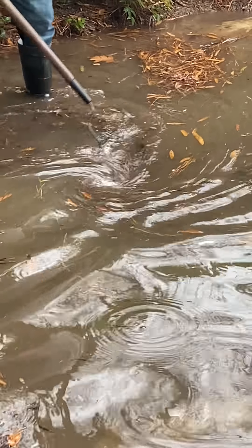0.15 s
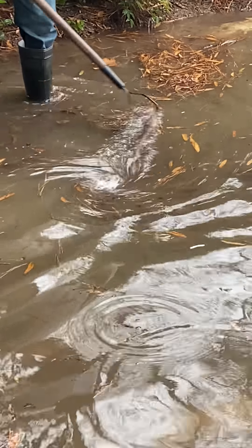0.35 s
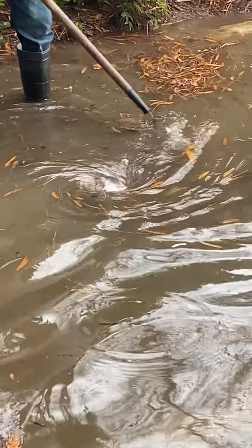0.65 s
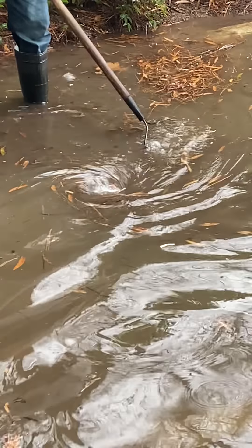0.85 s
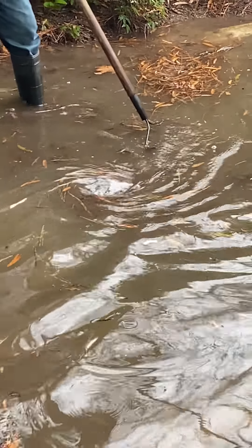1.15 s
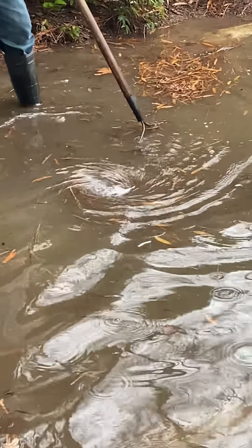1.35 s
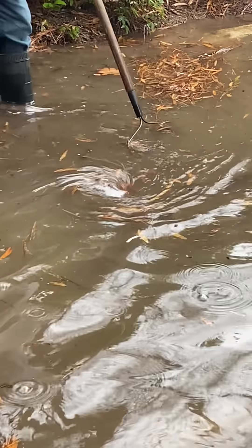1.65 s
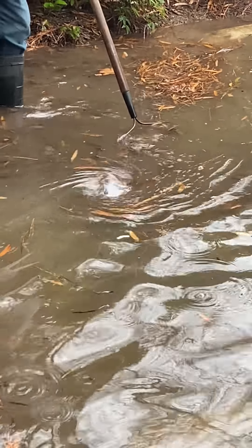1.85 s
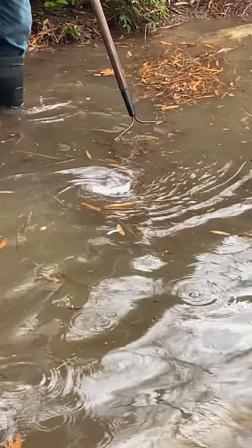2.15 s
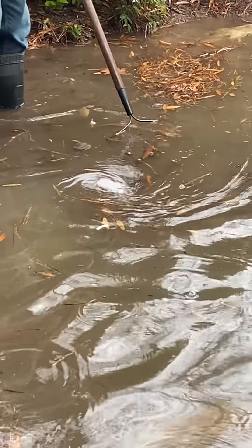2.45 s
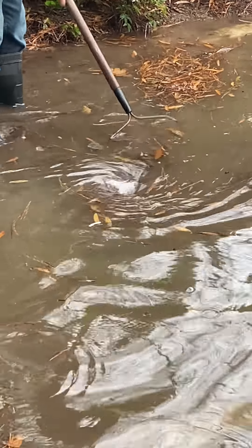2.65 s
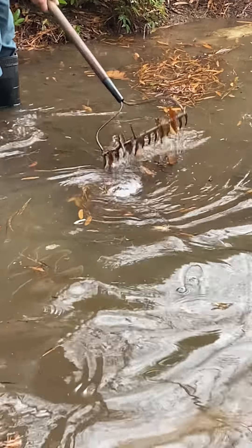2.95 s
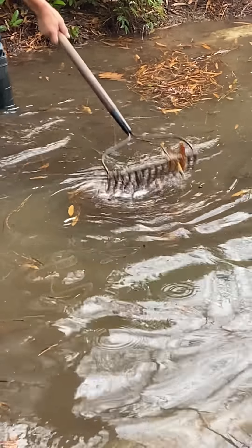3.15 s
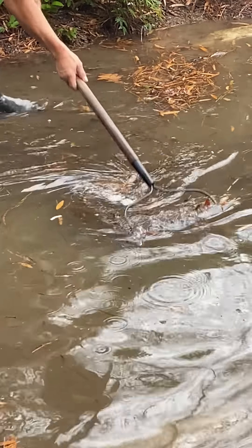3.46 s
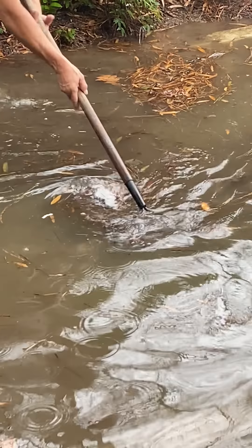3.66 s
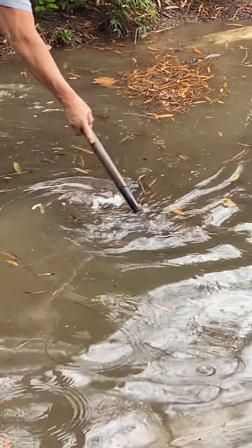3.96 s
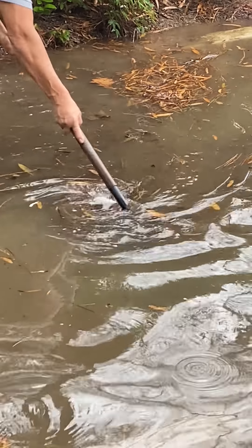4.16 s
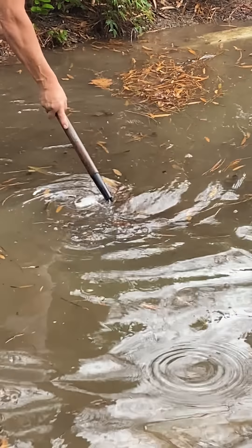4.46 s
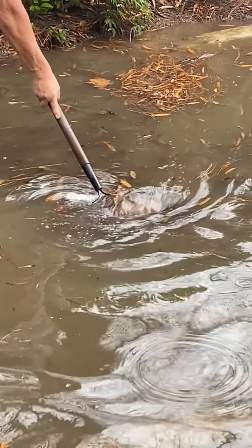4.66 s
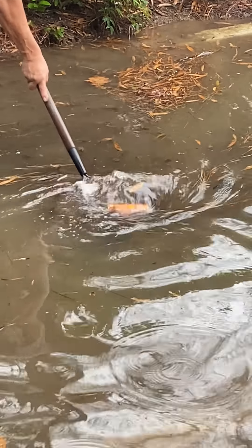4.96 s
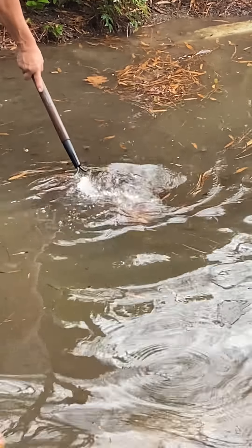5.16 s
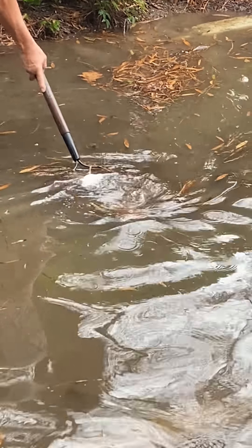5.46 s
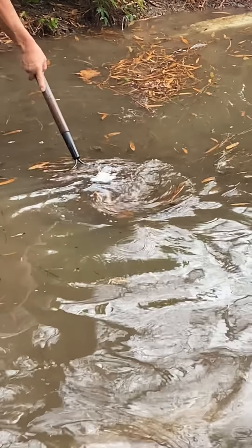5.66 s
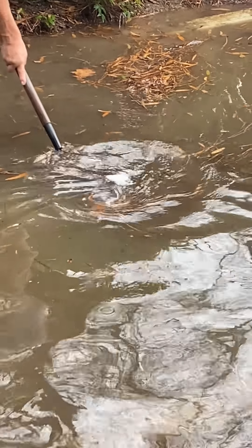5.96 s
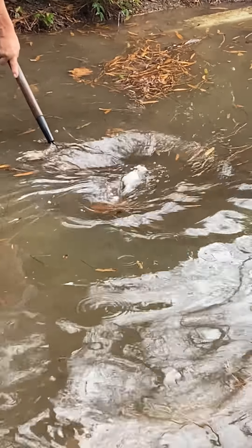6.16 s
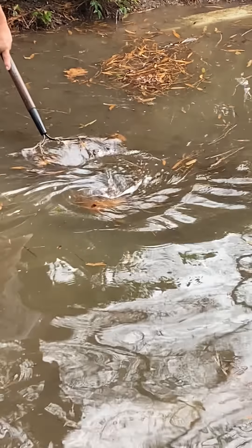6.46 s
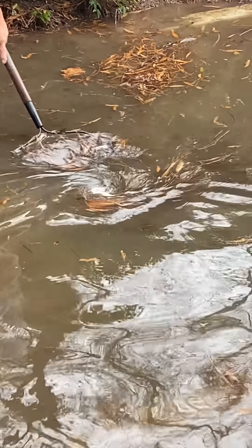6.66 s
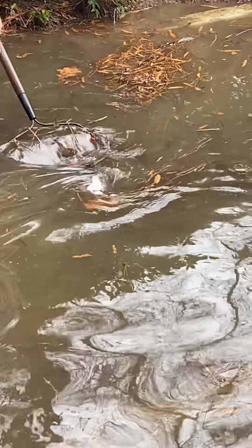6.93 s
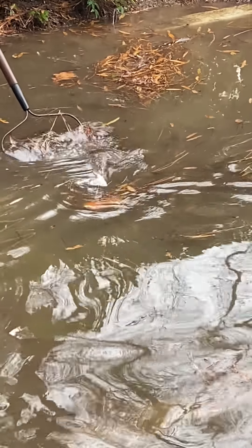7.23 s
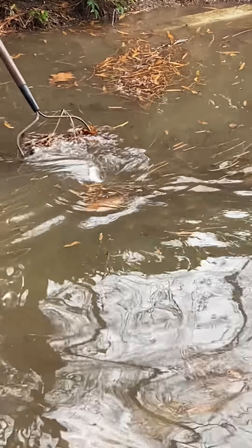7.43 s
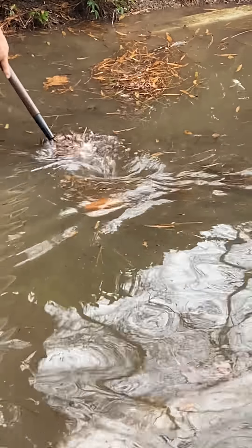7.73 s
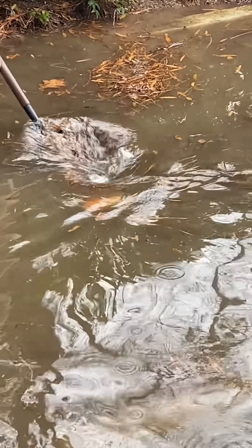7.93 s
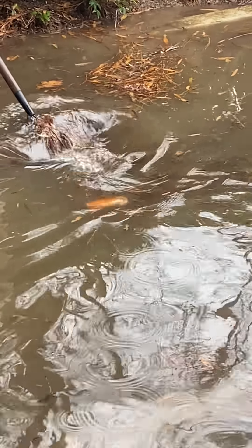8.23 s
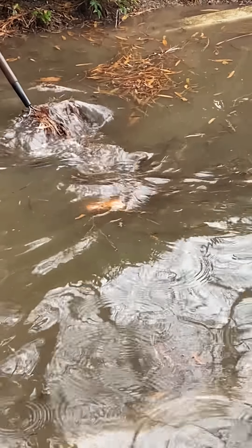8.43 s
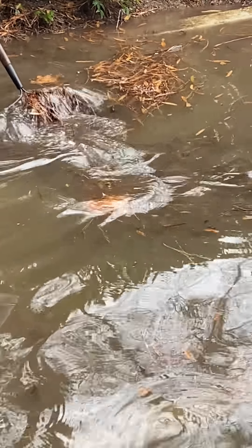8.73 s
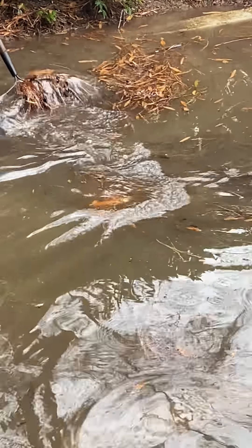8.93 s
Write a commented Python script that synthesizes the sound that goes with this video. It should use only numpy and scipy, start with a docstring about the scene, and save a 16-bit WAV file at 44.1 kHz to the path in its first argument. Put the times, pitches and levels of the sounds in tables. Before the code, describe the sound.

Deep steady rush of floodwater falling into a street drain, with fizzing stirred water, bubbles and drips, faint bird chips, and short steel rake scrapes.

```python
"""Floodwater pours through a street drain: a deep, steady rush of shaped noise from first to last.
From the start stirred water fizzes (noise and bubble crowds), drops crack and bubbles ring; from 0.3 s
birds chip in the trees as quick upward sweeps. A steel rake scrapes the grate near 0.5 s, then at
4.2-5.4 s and 7.7-9.1 s: stick-slip noise rings its modes. Two microphone ports hear it all."""
import sys
import numpy as np
from scipy import signal
from scipy.fft import rfft, irfft
from scipy.io import wavfile
from scipy.ndimage import uniform_filter1d

SR = 44100
rng = np.random.default_rng(int(sys.argv[2]) if len(sys.argv) > 2 else 0)


def to_wav(s):
    """Save 16-bit WAV."""
    ch = np.atleast_2d(s).T  # columns
    pcm = np.round(np.clip(ch, -1, 1) * 32767)  # PCM
    wavfile.write(sys.argv[1], SR, pcm.astype(np.int16))


N = 400869
T = np.arange(N) / SR
HZ = np.maximum(np.fft.rfftfreq(N, 1 / SR), 1)
MID_SIDE = np.array([[1], [-1]])  # sign of the side signal at the left and right port


def undb(db):
    """Decibels to amplitude ratio."""
    return 10 ** (np.asarray(db) / 20)


def over_hz(table, column=1):
    """Spread a table column over all frequencies, straight on a log axis."""
    rows = np.array(table, float)
    log_hz = np.log(np.maximum(rows[:, 0], 1))
    return np.interp(np.log(HZ), log_hz, rows[:, column])


def shape(x, gain):
    """Filter by a gain per frequency."""
    return irfft(rfft(x) * gain, N)


def unit(x):
    """Scale to an RMS of 1."""
    return x / np.sqrt(np.mean(x ** 2))


def walk(rate_hz):
    """Random levels, held 1 / rate_hz and smoothed twice; standard deviation 1."""
    hold = int(SR / rate_hz)
    steps = np.repeat(rng.standard_normal(N // hold + 1), hold)
    smooth = uniform_filter1d(uniform_filter1d(steps, hold), hold)[:N]
    return smooth / smooth.std()


def add(track, start_s, sound):
    """Mix a sound into a track at its start time."""
    i = int(start_s * SR)
    track[i:i + len(sound)] += sound[:N - i]


def bubble(hz, rise, length_s, swell=0.049, fade_db=60):
    """A pocket of air rings, fades and climbs in pitch as it nears the surface."""
    u = np.arange(int(length_s * SR)) / (length_s * SR)
    edges = np.minimum(u / swell, 1) * np.minimum((1 - u) / swell, 1)
    cycles = hz * length_s * (u + rise * u ** 2 / 2)
    return np.sin(2 * np.pi * cycles) * undb(-fade_db * u) * edges


def crowd(low_hz, high_hz, cycles, spread_db, count):
    """Many bubbles at random moments, of random size, ring, rise and strength."""
    out = np.zeros(N)
    for when, size, ring, rise, loud in rng.random((count, 5)):
        hz = low_hz * (high_hz / low_hz) ** size
        length_s = cycles * (0.75 + ring) / hz
        level_db = -spread_db * np.log(1.02 - loud)
        add(out, when * N / SR, bubble(hz, 0.91 * rise, length_s) * undb(level_db))
    return out


def echo(x, t60_s, db, build_s, apart):
    """Scattered reflections build up and die away, partly unlike at the two ports."""
    t = np.arange(SR) / SR
    envelope = undb(-60 * t / t60_s) * np.minimum(t / build_s, 1)
    same, unlike = rng.standard_normal((2, SR)) * envelope
    tails = (same + apart * unlike * MID_SIDE) / np.linalg.norm(same)
    return x + undb(db) * signal.fftconvolve(x[None], tails, axes=1)[:, :N]


CHIP_SWEEP_HZ = 1320
# bird chips: (time [s], level [dB], top pitch [Hz], length [s], husk: pitch noise before smoothing [Hz])
CHIPS = [(.3, -54, 7800, .021, 1200), (1.294, -59, 8000, .012, 1500), (2.108, -51, 7870, .019, 150),
         (2.476, -58, 8050, .012, 1200), (2.57, -49, 7800, 0.014, 1200), (4.407, -56, 8100, .01, 600),
         (4.52, -58, 7700, .02, 300), (5.768, -54, 7560, .013, 1200), (6.202, -61, 7340, .02, 600),
         (6.703, -52, 8000, 0.015, 1200), (8.186, -42, 7300, 0.027, 600)]


def birds():
    """Chips shoot up in pitch and level off; random pitch flutter makes some husky."""
    out = np.zeros(N)
    for start_s, db, top_hz, length_s, husk_hz in CHIPS:
        u = np.arange(int(length_s * SR)) / (length_s * SR)
        husk = uniform_filter1d(rng.standard_normal(len(u)), size=40)
        hz = top_hz - CHIP_SWEEP_HZ * np.exp(-u / 0.24) + husk_hz * husk
        envelope = np.sin(np.pi * u ** 0.82) ** 0.23
        add(out, start_s, undb(db) * envelope * np.sin(2 * np.pi * np.cumsum(hz) / SR))
    return out


FLOW_DB, FLOW_WANDER_DB = -2.5, .4  # level of the rush above its spectrum, slow drift
# spectrum of the rush: (frequency [Hz], density before FLOW_DB [dB per Hz])
RUSH = [(25.3, -76), (40.5, -62), (58.8, -50.5), (108, -55), (166, -62), (324, -71), (558, -75), (874, -78),
        (1590, -90), (2680, -99), (3700, -106), (6760, -110), (8330, -113), (11600, -128)]
# likeness of the rush at the two ports: (frequency [Hz], correlation [0-1])
LIKENESS = [(130, 1), (200, .995), (324, .985), (558, .88), (874, .44), (1590, .5), (2680, 1), (3700, .88),
            (6760, .9), (11600, .5)]


def drain():
    """Falling water booms in the shaft; the middle range reaches the ports from many sides."""
    like = np.clip(over_hz(LIKENESS), 0, 1)
    gain = undb(over_hz(RUSH)) * np.sqrt(SR / 2)
    mid = shape(rng.standard_normal(N), gain * np.sqrt((1 + like) / 2))
    side = shape(rng.standard_normal(N), gain * np.sqrt((1 - like) / 2))
    return (mid + side * MID_SIDE) * undb(FLOW_DB + FLOW_WANDER_DB * walk(6))


SPRAY_DB, SPRAY_WANDER_DB = -3.7, 3.5  # finest droplets relative to the fizz, their drift
# stirring of the water: (time [s], fizz level [dB], gurgle above the fizz [dB])
STIR = [(0, -61, 9), (.45, -72, -20), (.55, -60, 5), (.585, -48, -6), (.62, -58.5, 4), (.67, -56.5, -1),
        (.8, -68, 5), (1.1, -70.5, 0), (2.33, -80, 13.5), (2.45, -66.5, 4), (2.85, -64, 0),
        (2.98, -58.5, -10), (3.24, -65.5, -17), (3.45, -61, -6), (3.9, -71, 4), (4.65, -62.5, 4.5),
        (4.8, -65, 4), (5.05, -59, 10.5), (5.5, -69, 4), (5.9, -68, 8), (6.4, -72, 10.5), (7.0, -67, 3),
        (7.4, -60.5, -1.5), (7.82, -57, -3.5), (8.33, -54, 3.5), (8.5, -55.5, 6.5), (8.63, -66, -3),
        (8.75, -57, -0.5), (9.09, -61, 3)]
# filter colouring the fizz: (frequency [Hz], relative gain [dB])
FIZZ = [(900, -27), (1600, -8), (2500, -7.5), (4000, -4), (5500, -5.5), (7300, -3), (9000, -3.5),
        (11000, -13.5), (12500, -25)]


def stirred_water():
    """Flickering hiss, spattering droplets and a churn of larger bubbles follow the stirring."""
    time_s, fizz_db, gurgle_db = np.transpose(STIR)
    hits = (rng.random(N) < 130 / SR) * undb(2.0 * np.minimum(rng.exponential(size=N), 3))
    patter = signal.lfilter([1], [1, -.985], hits)  # bursts of about 1.5 ms
    hiss = unit(rng.standard_normal(N) * undb(2.57 * walk(25)) * (1 + 1.74 * patter))
    spatter = unit(crowd(1490, 12000, 8.7, 4.2, count=4000))
    chirps = unit(crowd(1338, 5880, 39.5, 4.0, count=1600))
    mix = hiss + undb(-8.0) * spatter + undb(-4.5) * chirps
    fizz = unit(shape(mix, undb(over_hz(FIZZ)) * (HZ > 500)))

    spray = shape(fizz, 1 / (1 + (6500 / HZ) ** 8))  # finest droplets, drifting on their own
    spray_gain = undb(SPRAY_DB + SPRAY_WANDER_DB * walk(3.03))
    gurgle = unit(crowd(501.4, 2830, 20.0, 3.1, count=6000))
    plinks = unit(crowd(910, 4220, 24.0, 4.5, count=450))  # separate drips that stand out
    water = fizz + spray * (spray_gain - 1)
    water += plinks * undb(-7.5)
    water += gurgle * undb(np.interp(T, time_s, gurgle_db))
    return water * undb(np.interp(T, time_s, fizz_db))


FAINT_DROP_DB, FAINT_SPREAD_DB, FAINT_TREBLE_DB = -55, 8, -22  # lowest level, range, dullest treble
BUBBLE_MS_AT_1K, BUBBLE_LENGTH_POWER = 20, 0.89  # length without glide; higher bubbles ring shorter
GLIDE_STRETCH = .8  # far-gliding bubbles ring longer
BIRTH_DB = -12.5  # pinch-off snap relative to its bubble
# drops that snap on the surface: (time [s], level [dB], treble above that [dB])
DROPS = [(0.048, -40.5, -13), (0.0616, -42.5, 2), (0.3124, -43.5, -35), (0.489, -52, -24),
         (0.521, -41, -20), (0.549, -48, -30), (0.672, -44, -19), (0.9303, -54, -31), (0.9677, -50.5, -4),
         (1.6415, -48.5, -5), (1.796, -51, -20), (2.442, -52, -28), (2.5678, -47, -25), (2.6522, -39, -6),
         (2.908, -42.5, -23), (3.258, -51, 4), (3.346, -38.5, -4), (3.5064, -41, -25), (3.7544, -42, -10),
         (3.7864, -38.5, -19), (4.109, -50, -1), (4.7074, -49, 10), (4.8755, -34, -6), (5.2719, -43, 0),
         (5.662, -48.5, -20), (5.903, -46.5, -36), (6.173, -43.5, -25), (6.2473, -44, -29),
         (6.5694, -47, -2), (6.6653, -45, -35), (7.124, -49, 7), (7.337, -46.5, -29), (7.408, -47, 4),
         (7.458, -46.5, 4), (7.4869, -40.5, -9), (7.899, -41.5, -14)]
# single bubbles: (time [s], level before fading [dB], start pitch [Hz], pitch rise [share of start])
BUBBLES = [(0.216, -40.5, 3930, .15), (.501, -44.5, 2950, .05), (0.532, -40, 2940, .05),
           (0.566, -31.5, 624, .05), (0.669, -44, 3200, 0.046), (0.93, -38.5, 3240, .05),
           (2.892, -43.5, 2050, .42), (2.938, -44, 1640, .05), (3.049, -45, 1330, .14),
           (3.135, -45, 3280, .05), (3.376, -45, 2110, .05), (3.431, -41, 2880, .34),
           (3.461, -41, 3440, 0.093), (3.472, -40, 1360, 0.25), (3.523, -31, 2150, .05),
           (3.754, -36, 3600, .1), (4.133, -44, 3230, .04), (4.228, -28, 1084, 0.22),
           (4.239, -38.5, 1500, 0.64), (4.284, -34, 1185, 0.13), (4.503, -37, 960, 0.35),
           (4.955, -39, 826, .08), (5.047, -32.5, 1096, 0.26), (5.072, -36, 514, 0.86),
           (5.199, -35.5, 940, 0.14), (5.267, -39.5, 2130, .08), (6.665, -36.5, 3470, 0.09),
           (6.771, -45, 3200, 0.11), (7.26, -39.5, 2640, 0.21), (8.168, -34, 3570, .12),
           (8.196, -36, 2850, .55), (8.61, -35, 690, 0.057), (8.658, -35, 980, 0.05)]


def drips():
    """Drops crack as short noise bursts; bubbles snap as they pinch off, then ring."""
    out = np.zeros(N)
    t = np.arange(512) / SR
    low = signal.butter(2, [1800, 6600], "band", fs=SR, output="sos")
    high = signal.butter(2, [6000, 8700], "band", fs=SR, output="sos")
    faint = [(when * N / SR, FAINT_DROP_DB + FAINT_SPREAD_DB * loud, FAINT_TREBLE_DB * dullness)
             for when, loud, dullness in rng.random((24, 3))]
    for start_s, db, treble_db in DROPS + faint:
        crack = rng.standard_normal(len(t)) * np.minimum(t / 0.0013, 1) * np.exp(-t / 0.002)
        dull, sharp = signal.sosfilt(low, crack), signal.sosfilt(high, crack)
        drop = dull / np.abs(dull).max() + undb(treble_db) * sharp / np.abs(sharp).max()
        add(out, start_s, undb(db) * drop)
    for start_s, db, hz, rise in BUBBLES:
        length_s = BUBBLE_MS_AT_1K / 1e3 * (1e3 / hz) ** BUBBLE_LENGTH_POWER
        length_s *= 1 + GLIDE_STRETCH * rise
        snap = signal.sosfilt(low, rng.standard_normal(len(t)) * np.exp(-t / .0012))
        add(out, start_s, undb(db + BIRTH_DB) * snap / np.abs(snap).max())
        add(out, start_s, undb(db) * bubble(hz, rise, length_s, swell=0.19, fade_db=24.5))
    return out


CHATTER_GAP_S, CHATTER_SPREAD_DB, CHATTER_DETUNE = .02, 0.5, 0.018  # detune: share of the pitch
# light drags over the bars: (start [s], length [s], mean level [dB], mean tine pitch [Hz],
# treble above the level [dB])
DRAGS = [(4.215, .045, -38.5, 2100, -19), (4.437, .1, -42, 1950, -27), (4.882, .055, -42, 1940, -1),
         (5.006, .03, -37, 1400, -11), (8.726, .36, -44.5, 1520, 4.5)]


def chatter():
    """A tine hopping from bar to bar turns each light drag into a row of uneven small catches."""
    rows = []
    for start_s, length_s, db, touch_hz, treble_db in DRAGS:
        gap, loud, pitch = rng.standard_normal((24, 3)).T
        times_s = start_s + CHATTER_GAP_S * (np.arange(len(gap)) + .25 * gap)
        levels_db = db + CHATTER_SPREAD_DB * loud
        pitches_hz = touch_hz * (1 + CHATTER_DETUNE * pitch)
        rows += [(when, level, hz, treble_db)
                 for when, level, hz in zip(times_s, levels_db, pitches_hz)
                 if when < start_s + length_s]
    return rows


CATCH_S = 0.014  # decay time of the grip
# catches of a tine on the grate: (time [s], peak level [dB], pitch of the touching tine [Hz],
# treble above the level [dB])
SCRAPES = [(0.56, -27.5, 3500, -4), (0.5826, -28.5, 2000, -4), (0.593, -47, 1650, -12),
           (4.2054, -34, 1920, -32), (4.2289, -31, 2200, -29), (4.2818, -30, 1910, -28),
           (4.2958, -34.5, 1290, -28), (4.503, -36.5, 1970, -18), (4.559, -28, 1990, -11),
           (4.5675, -29.5, 2000, -17), (4.589, -33, 1940, -6), (4.6128, -33, 1950, -15),
           (4.6222, -27.5, 2000, -29), (4.917, -32.5, 1830, -16), (4.943, -27, 2170, -10),
           (4.963, -31.5, 1890, 0.5), (4.978, -37, 1990, 1), (4.992, -30, 2010, -4),
           (5.221, -41, 1510, -27), (5.385, -44.5, 1960, -17), (7.658, -37, 2460, 2), (7.83, -40, 2280, -2),
           (8.09, -33, 1960, -23), (8.294, -33.5, 2850, -13), (8.659, -36.5, 2970, -6),
           (8.681, -37.5, 1700, -3), (8.715, -38, 1520, -7), (8.7807, -43, 2900, -5),
           (8.9344, -39.5, 1580, 2), (8.962, -43, 1580, -4)]
# modes of the rake head: (mean frequency [Hz], t60 [s], relative level [dB])
RAKE = [(1150, .025, 0), (1570, .03, 0), (1960, .028, 3), (2220, .025, 0), (2950, .018, 1.5),
        (3300, .018, 0), (3920, .014, -1.5), (4400, .009, -2), (5600, .009, -4), (7000, .011, 2),
        (8800, .013, 1)]


def rake():
    """Stick-slip clicks through wet leaves ring low modes near the touching tine; the first slips wake high ones."""
    out = np.zeros(N)
    t = np.arange(2048) / SR
    hz, t60_s, mode_db = np.array(RAKE).T[:, :, None]
    high = hz[:, 0] > 4200
    crunch = np.exp(-t / 0.00019) * np.sin(2 * np.pi * 2400 * t)  # leaves and grit, a broad thump
    edge = np.exp(-t / .0001) * np.sin(2 * np.pi * 5600 * t)  # and their sharp edge
    for start_s, db, touch_hz, treble_db in SCRAPES + chatter():
        chance = rng.standard_normal((2, len(t)))
        slips = unit(chance[0] * np.abs(chance[1]) ** 0.56)
        # water and leaves load the tines differently on each catch
        detune, share = rng.standard_normal((2, len(hz), 1))
        away_octaves = np.minimum(abs(np.log2(hz / touch_hz)), .8) * ~high[:, None]
        strength_db = mode_db - 30 * away_octaves + 2.5 * share
        ringing = np.sin(2 * np.pi * hz * (1 + 0.01 * detune) * t)
        modes = undb(strength_db - 60 * t / t60_s) * ringing
        low_ring = modes[~high].sum(axis=0) + 5.7 * crunch
        high_ring = modes[high].sum(axis=0) + 8 * edge
        parts = ((low_ring, db, CATCH_S, .003),
                 (high_ring, db + treble_db, 0.35 * CATCH_S, .0012))
        for ring, part_db, hold_s, bite_s in parts:
            # the tine bites, holds a moment and lets go
            grip = np.minimum(t / bite_s, 1) * np.exp(-(t / hold_s) ** 1.53)
            sound = signal.fftconvolve(slips * grip, ring)
            add(out, start_s - .0015, sound * undb(part_db) / np.abs(sound).max())
    return out


STREET_T60_S, STREET_DB, TREES_T60_S, TREES_DB = 0.096, -11, 0.36, -6.5


def scene():
    """Birds echo among the trees, rake and stirred water off the street; the rush stays as it is."""
    trees = echo(birds(), TREES_T60_S, TREES_DB, build_s=0.012, apart=0.069)
    sources = stirred_water() + drips() + rake()
    near = echo(sources, STREET_T60_S, STREET_DB, build_s=0.0058, apart=0.29)
    return trees + drain() + near


TOP_HZ = 12540
# phase by which the left port leads: (frequency [Hz], lead [rad])
PORT_LEAD = [(0, 0), (110, -.01), (300, -.12), (500, -.05), (700, .09), (1050, -.39), (1400, -.17),
             (1800, .03), (2500, .6), (3300, .2), (4350, .9), (5050, .3), (5700, 1.06), (7000, 2.9),
             (7400, 3.15), (9550, 5.5), (10400, 6.3), (10900, 6.43), (11300, 6.8), (13000, 9.3)]
# level gap between the ports: (frequency [Hz], left minus right [dB])
PORT_BALANCE = [(250, 0), (430, -.4), (600, .6), (950, 3), (1400, 2.6), (2240, 1), (2700, 0)]


def record(dry):
    """The two ports differ in phase and a little in level; a low-pass cuts the top."""
    lead_hz, lead_rad = np.transpose(PORT_LEAD)
    half_lead = np.exp(.5j * np.interp(HZ, lead_hz, lead_rad))
    half = undb(over_hz(PORT_BALANCE) / 2) * half_lead
    ports = np.array([shape(dry[0], half), shape(dry[1], 1 / half)])
    return signal.sosfilt(signal.ellip(6, .2, 40, TOP_HZ, fs=SR, output="sos"), ports)


dry = scene()
out = record(dry)
to_wav(out)
```